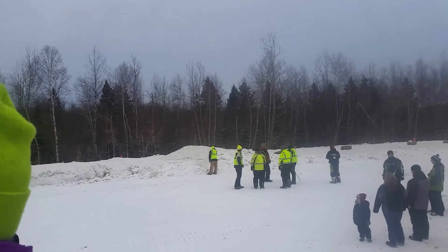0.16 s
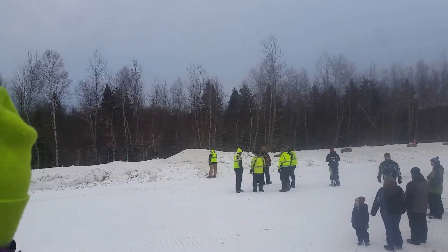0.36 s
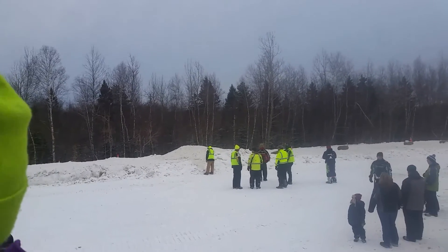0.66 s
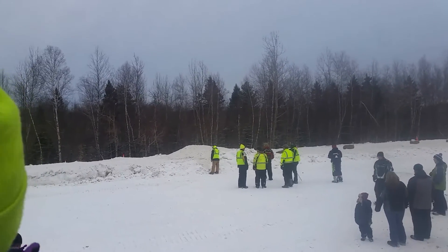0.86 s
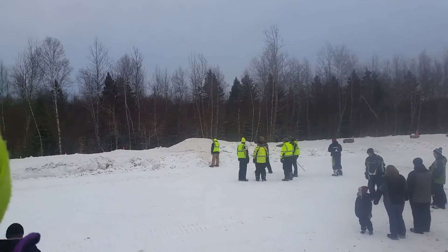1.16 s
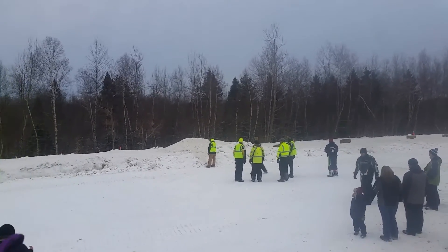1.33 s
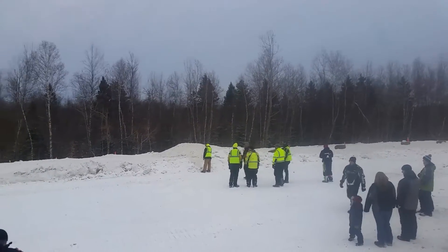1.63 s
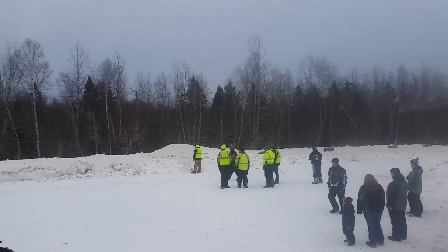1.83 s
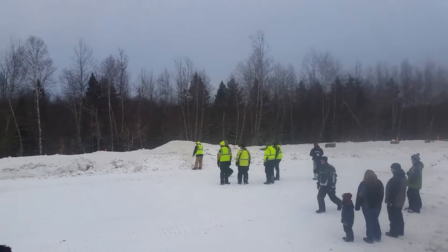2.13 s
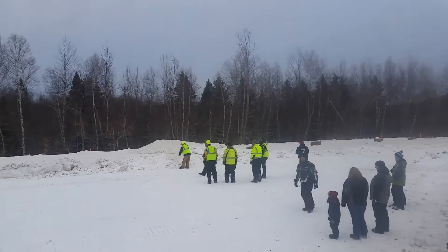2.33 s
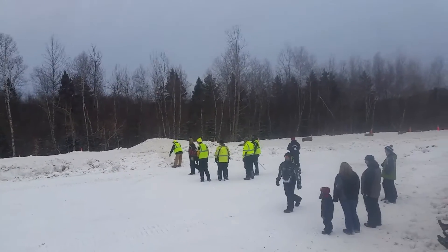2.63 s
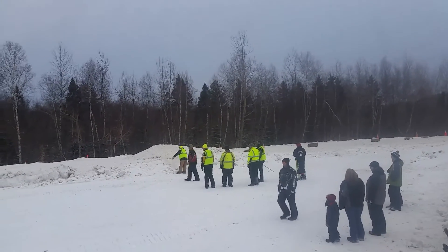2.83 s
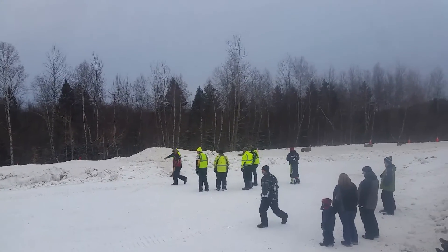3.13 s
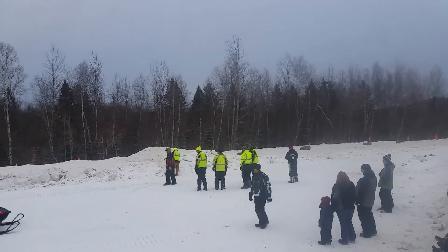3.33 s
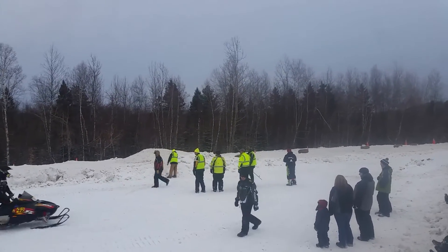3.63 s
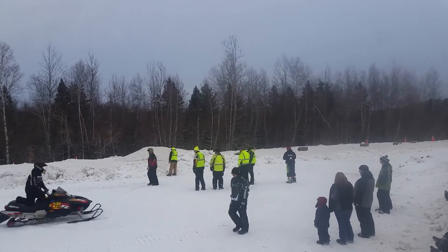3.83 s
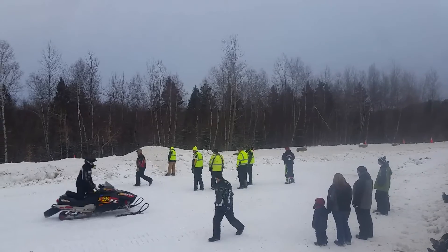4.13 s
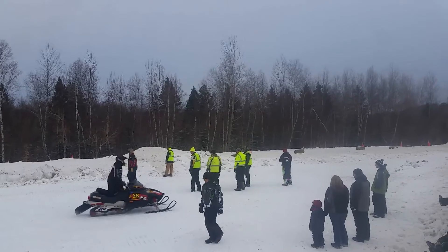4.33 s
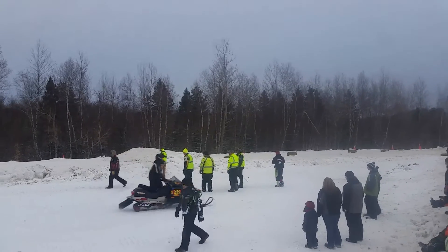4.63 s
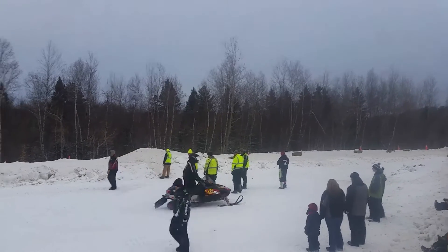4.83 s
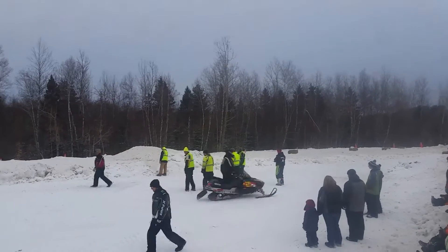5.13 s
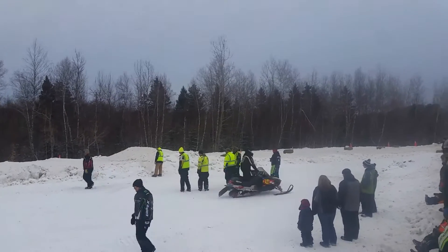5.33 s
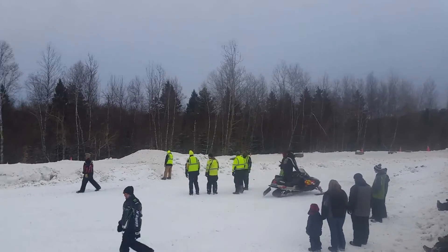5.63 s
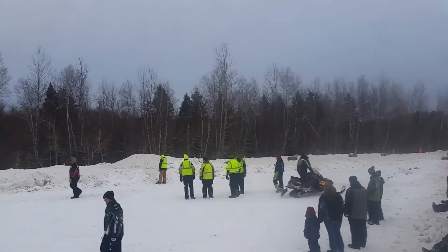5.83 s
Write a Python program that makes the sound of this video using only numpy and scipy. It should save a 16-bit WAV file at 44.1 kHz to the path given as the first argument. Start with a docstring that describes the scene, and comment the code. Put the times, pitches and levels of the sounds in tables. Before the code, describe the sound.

A two-stroke twin snowmobile is already running at the start and continues for the full six seconds, creeping past on part throttle. Roughly 115 to 130 exhaust strokes a second merge into a deep, hollow, buzzing throb. Over it, uneven sharp cracks come many times a second, singly or in short runs, with metallic panel ringing and tight slaps off chassis and snow. The revs jump slightly at about 1 s, sag around 2.2 to 2.5 s, rise near 3.2 s, dip near 3.7 s, rise again at 4.6 s and ease after 5.5 s. The low throb is strong around 0.3 and 2.2 s and weaker after 4 s, while pops grow harder, loudest around 5.0 to 5.7 s. Airy track and fan hiss flickers throughout, growing somewhat later. Low wind rumbles on a close, slightly saturated phone microphone outdoors. The stereo moves subtly from left toward centre and right.

```python
"""Snowmobile creeping past

A two-stroke twin snowmobile creeps across a snowy field on part throttle, passing a phone from left to right.
Every stroke thumps the exhaust pipe, made by ringing resonances with soft pulses; a silencer boom adds to it.
Only some charges burn hard: these crack out of the outlet as sharp clicks, slap back off chassis and snow,
and make panels ring. Filtered noise makes track and fan hiss, and wind rumble on the two microphone ports."""
import sys
import numpy as np
from scipy import signal
from scipy.fft import rfft, irfft
from scipy.io import wavfile
from scipy.ndimage import uniform_filter1d, map_coordinates

SR = 44100
rng = np.random.default_rng(int(sys.argv[2]) if len(sys.argv) > 2 else 0)


def materialize(psi):
    """Save the field psi as 16-bit PCM at rate SR to the path in sys.argv[1].

    A 1-D psi becomes a single channel; in a 2-D psi each row is a channel.
    """
    bounded = np.clip(np.atleast_2d(psi).T, -1, 1)
    quanta = np.round(bounded * 32767).astype(np.int16)
    wavfile.write(sys.argv[1], SR, quanta)


N = 263806
T = np.arange(N) / SR  # time of every sample, s

# The drive; each layer adds its own fixed trim to these levels:
# (t/s, pipe level/dB, upper pipe ring against it/dB, hiss level/dB, treble level/dB, wind level/dB)
DRIVE = [(0.0, -12.5, -65, -44.5, -39, -15), (0.271, -7, -18, -38, -38.5, -17.5),
         (0.45, -14, -14, -46.5, -35, -17.5), (0.93, -8.5, -15, -35.5, -40.5, -14.5),
         (1.04, -10, -14.5, -39.5, -33.5, -14.5), (1.179, -10.5, -14, -41, -36.5, -19),
         (1.291, -10.5, -13.5, -39, -34.5, -17.5), (1.45, -13, -15.5, -45.5, -36.5, -16.5),
         (1.831, -12, -15, -33.5, -35, -16.5), (2.201, -7.5, -18, -34.5, -41.5, -17),
         (2.456, -9, -14, -37.5, -44, -14.5), (2.733, -11.5, -13, -40.5, -37, -14),
         (2.93, -14.5, -15.5, -32, -40, -16.5), (3.202, -11, -24, -33.5, -33.5, -15.5),
         (3.55, -12, -20, -32, -35, -18.5), (4.081, -13.5, -10, -35.5, -38.5, -19.5),
         (4.604, -17, -9.5, -34.5, -40, -17), (4.996, -13, -14, -30, -38, -14),
         (5.548, -17, -8.5, -33, -39, -14.5), (5.98, -14, -7.5, -36, -38, -15.5)]
# How fast the strokes follow each other: (t/s, stroke rate f/Hz)
STROKE_RATE = [(0, 114), (.15, 116.5), (.3, 113.5), (.5, 118.5), (.7, 116), (.9, 119), (1.03, 130),
               (1.17, 125.5), (1.28, 132), (1.45, 126), (1.65, 128), (1.9, 120), (2.2, 117.5), (2.45, 117),
               (2.8, 124), (3.15, 130), (3.45, 124.5), (3.7, 121), (4.1, 125.5), (4.55, 130), (5, 126),
               (5.55, 121), (5.75, 124), (5.98, 124)]
# The machine crosses in front of the phone:
# (t/s, left port lead/ms, left minus right/dB, treble left minus right/dB)
CROSSING = [(0, 0.38, 5.5, -2), (0.504, 0.43, 9, -0.5), (1, 0.36, 4.5, 6.5), (1.4, 0.47, 4.5, 8),
            (1.796, 0.39, -2.5, 8.5), (2.299, 0.4, 4.5, 5), (2.601, 0.42, -0.5, 1.5),
            (3.199, 0.25, -1.5, 1), (3.602, 0.17, -1.5, 6.5), (3.999, 0.12, 1, 3), (4.599, 0.13, 6, 1.5),
            (5.199, -0.13, -1.5, 2.5), (5.98, -0.15, 2, 3)]

# Wind rumble: (f/Hz, level per Hz/dB)
WIND_COLOUR = [(20, -26), (45, -9.5), (65, -1.5), (90, -3.5), (140, 5.5), (190, -3.5), (300, -3.5),
               (500, -14), (2500, -100)]
# The ports ring in the top octave: (f/Hz, level per Hz/dB)
TREBLE_COLOUR = [(4410, -83.5), (7500, -46.5), (8970, -35), (10700, -23), (11100, -19), (12700, -18),
                 (14600, -16.5), (15600, -21.5), (16300, -101.5)]
# How differently the two ports hear each pitch: (f/Hz, left minus right/dB)
PORT_COLOUR = [(500, 11), (700, 2.5), (950, 3.5), (1290, 1), (1800, 6), (2380, 15), (3200, 18.5),
               (4400, 15.5), (8120, 12.5), (11000, -3.5), (13000, 9), (15000, 10.5)]
# Colour of cracks and hiss from the machine's nose, flank and tail: (f/Hz, level per Hz/dB)
NOSE_COLOUR = [(350, -44.5), (600, -12.5), (633, -17), (696, -5.5), (757, 1), (955, -10), (1370, -13),
               (2160, -6), (3770, -17.5), (4150, -22), (4860, -25), (7500, -36.5), (9750, -83),
               (16500, -120)]
FLANK_COLOUR = [(350, -36.5), (600, -48), (711, -7), (773, -5), (1160, -13.5), (1300, -17), (1500, -20.5),
                (1640, -13.5), (1920, -17), (3850, -29), (4970, -39.5), (7500, -48.5), (9750, -96.5),
                (16500, -120)]
TAIL_COLOUR = [(350, -39.5), (600, 1), (824, -3.5), (897, -15.5), (1010, -6.5), (1260, -5.5), (1760, -8),
               (1980, -8), (2600, -9), (2880, -20), (3250, -17), (3700, -23.5), (4100, -24), (5400, -32),
               (7500, -42), (9750, -75), (16500, -120)]
VIEWS_S = 0.54, 2.63, 4.9  # when nose, flank and tail are heard, s

# Exhaust pipe resonances, low and upper: (f/Hz, width/Hz, level/dB)
LOW_PIPE = [(62, 10, -21.5), (129, 70, 5), (249.7, 38.9, 19)]
UPPER_PIPE = [(376.5, 169, 6.87), (437.5, 172.3, 4.37)]
# Silencer resonances after a hard burn: (f/Hz, width/Hz, level/dB)
BOOM_MODES = [(70.6, 22, -1), (146, 49, -3), (273, 13.3, 5.5), (435.6, 42, 0.5)]
# Ringing cowl and silencer panels: (f/Hz, width/Hz, level/dB, faces the phone at t/s, swell time/s)
PANEL_MODES = [(4750, 130, -6.5, 0.45, 0.72), (3660, 200, -11, 1.3, 0.58), (5800, 1200, -7.5, 3.9, 0.66),
               (1685, 61, -10, 1.8, 0.47), (2120, 300, -12, 0.23, 0.48), (646, 190, -0.5, 0.8, 1),
               (964, 73, 1, 0.82, 1), (1620, 100, -15, 0.6, 0.98), (690, 45, 2.5, 2.45, 0.33),
               (1279, 48, -10.5, 2.6, 0.68), (991, 12, -13, 3.7, 0.77), (526, 50, -11, 4.8, 0.88),
               (1145, 13, -4.5, 3.7, 0.065), (1160, 37, -5, 9.3, 0.14), (1373, 54, -7.5, 4.1, 0.46),
               (1290, 64, -3.5, 4.7, 0.36), (3000, 120, -10.5, 4.3, 0.26), (909, 36, -4.5, 4.8, 0.53),
               (1050, 38, -13, 5.5, 0.13), (1210, 35, -10.5, 5.8, 0.32), (1490, 35, -12.5, 10, 0.7),
               (1930, 170, -9, 5.8, 1), (3080, 490, -17, 4.3, 0.42), (2400, 240, -14.5, 5.3, 0.11),
               (2040, 170, -6, 6.4, 0.35), (648, 14, -3.5, 3.8, 0.96), (690, 40, -5.5, 5.15, 0.2),
               (2800, 250, -15, 2.4, 0.18), (1300, 58, -5, 1.25, 0.15), (1880, 130, -8, 2.2, 0.2),
               (3070, 180, -8.5, 6, 0.26), (3480, 210, -7, 3.8, 0.43), (2360, 470, -5, 3.5, 0.32)]

# The hardest burns: (t/s, crack level/dB, hard strokes ahead, hard strokes behind)
HARD_BURNS = [(0.0579, -18, 0, 0), (0.0839, -18, 0, 0), (0.1357, -16, 1, 0), (0.2134, -16, 0, 0),
              (0.2843, -25, 0, 1), (0.3454, -17, 1, 1), (0.3879, -20, 1, 0), (0.4133, -18, 0, 0),
              (0.4386, -19, 0, 0), (0.4724, -19, 0, 1), (0.5144, -17, 0, 0), (0.5398, -21, 0, 1),
              (0.5824, -19, 1, 0), (0.6255, -17, 1, 0), (0.6602, -18, 0, 1), (0.7031, -17, 0, 0),
              (0.7377, -23, 1, 1), (0.7804, -18, 1, 0), (0.8061, -20, 0, 0), (0.8317, -17, 0, 0),
              (0.866, -17, 0, 1), (0.8998, -19, 0, 0), (0.925, -18, 0, 0), (0.9419, -25, 1, 0),
              (0.975, -17, 1, 8), (1.0605, -21, 0, 3), (1.1069, -22, 0, 2), (1.1385, -23, 1, 3),
              (1.1939, -18, 1, 12), (1.3093, -19, 0, 3), (1.3636, -22, 0, 1), (1.3946, -18, 0, 0),
              (1.4344, -16, 1, 2), (1.4898, -18, 0, 3), (1.5449, -18, 1, 2), (1.5919, -18, 1, 2),
              (1.6389, -17, 1, 0), (1.6623, -19, 0, 0), (1.7179, -17, 1, 2), (1.7733, -19, 0, 1),
              (1.8057, -20, 0, 0), (1.8301, -19, 0, 0), (1.8878, -17, 0, 1), (1.9295, -18, 0, 0),
              (1.963, -17, 0, 0), (1.9967, -18, 1, 0), (2.0307, -18, 0, 1), (2.0725, -17, 0, 0),
              (2.1149, -16, 1, 1), (2.1576, -17, 0, 2), (2.2, -20, 0, 2), (2.26, -21, 1, 1),
              (2.3113, -25, 2, 1), (2.3713, -25, 1, 0), (2.4571, -22, 0, 0), (2.4828, -27, 1, 0),
              (2.5425, -18, 0, 1), (2.5844, -19, 1, 0), (2.6178, -26, 1, 0), (2.6345, -26, 0, 0),
              (2.6425, -18, 0, 0), (2.6839, -18, 0, 5), (2.7494, -23, 0, 1), (2.7822, -19, 1, 1),
              (2.8229, -23, 1, 2), (2.8715, -20, 1, 4), (2.9351, -18, 1, 0), (2.9589, -17, 0, 0),
              (2.9907, -18, 1, 0), (3.0222, -20, 0, 2), (3.0456, -24, 0, 0), (3.069, -20, 0, 3),
              (3.1156, -23, 1, 0), (3.1388, -22, 1, 0), (3.1621, -24, 1, 2), (3.2006, -22, 0, 1),
              (3.2316, -22, 1, 0), (3.2551, -22, 0, 1), (3.2784, -21, 1, 0), (3.294, -26, 1, 0),
              (3.3175, -17, 0, 0), (3.3412, -20, 0, 1), (3.3647, -21, 0, 2), (3.4042, -19, 0, 0),
              (3.4367, -18, 0, 2), (3.4931, -17, 0, 1), (3.5581, -22, 2, 2), (3.5826, -18, 0, 1),
              (3.6072, -23, 0, 0), (3.6153, -16, 0, 0), (3.6482, -17, 0, 1), (3.6897, -14, 0, 1),
              (3.7227, -19, 0, 1), (3.7474, -22, 0, 0), (3.772, -16, 0, 1), (3.8049, -18, 1, 2),
              (3.8457, -17, 0, 0), (3.8702, -19, 1, 2), (3.9027, -22, 0, 0), (3.9107, -14, 0, 0),
              (3.935, -19, 0, 0), (3.9511, -22, 0, 1), (3.9754, -15, 1, 2), (4.0236, -17, 0, 3),
              (4.0797, -17, 1, 2), (4.1197, -14, 0, 1), (4.16, -14, 1, 2), (4.2078, -16, 1, 2),
              (4.2555, -15, 1, 0), (4.2793, -17, 1, 1), (4.3268, -16, 1, 2), (4.3659, -17, 0, 2),
              (4.4204, -17, 1, 0), (4.4435, -20, 1, 0), (4.4665, -19, 1, 0), (4.4973, -17, 1, 0),
              (4.5205, -16, 1, 0), (4.5435, -18, 1, 0), (4.5818, -17, 0, 0), (4.6047, -19, 1, 1),
              (4.6202, -18, 0, 0), (4.628, -22, 0, 1), (4.6589, -16, 1, 0), (4.682, -18, 1, 0),
              (4.7208, -19, 0, 3), (4.7828, -16, 0, 2), (4.8061, -21, 0, 0), (4.845, -18, 0, 1),
              (4.8766, -19, 0, 0), (4.9159, -20, 0, 0), (4.9395, -19, 1, 0), (4.9871, -15, 1, 2),
              (5.0422, -14, 0, 0), (5.066, -16, 0, 0), (5.1055, -15, 0, 0), (5.1294, -15, 0, 0),
              (5.1453, -20, 0, 0), (5.1691, -15, 0, 0), (5.2092, -16, 0, 0), (5.2332, -16, 0, 0),
              (5.2654, -14, 1, 0), (5.3222, -15, 0, 1), (5.3633, -14, 1, 0), (5.3959, -16, 0, 0),
              (5.4286, -15, 1, 0), (5.478, -13, 1, 2), (5.5443, -12, 1, 2), (5.5943, -20, 0, 1),
              (5.6276, -14, 1, 0), (5.6682, -14, 1, 0), (5.6925, -16, 1, 0), (5.7168, -17, 0, 2),
              (5.7732, -19, 1, 0), (5.7975, -20, 1, 0), (5.8135, -22, 0, 0), (5.8376, -16, 0, 0),
              (5.8617, -19, 0, 0), (5.9019, -20, 0, 1), (5.9502, -18, 0, 1), (5.9746, -22, 0, 0)]
# Crack of the strokes that hardly burn: (t/s, level/dB)
SOFT_BURNS = [(0, -29.5), (0.6, -38), (1.2, -35.5), (1.8, -39.5), (2.2, -32.5), (2.45, -37), (2.7, -33),
              (3.2, -44), (3.8, -37), (4.4, -42), (5, -34), (5.5, -36), (5.98, -29)]
# Pressure jump at the outlet: (t/s, level against the crack/dB)
BLAST_LEVEL = [(0, 9), (1.0, 8.5), (2.4, 9), (3.5, 9), (4.7, 3.5), (5.3, 11), (5.98, 4)]
# Slaps off the chassis: (delay at nose/ms, delay at flank/ms, delay at tail/ms, level/dB)
CHASSIS_SLAPS = [(1.1, 1.2, 1.1, -13), (3.3, 3.1, 3.0, -13), (4.6, 4.7, 4.4, -15), (5.8, 6.1, 5.7, -18)]
# The strongest slap, off the snow: (t/s, delay/ms, level/dB)
SNOW_SLAP = [(0, 2.35, -7), (1.2, 2.5, -5), (2.4, 2.5, -7), (3.2, 2.2, -8), (3.7, 1.8, -5), (4.7, 1.8, -5),
             (5.05, 1.93, -3), (5.25, 1.93, -3), (5.33, 2.45, -3), (5.98, 2.45, -5)]

TWIN_SHARE = 0.18  # one cylinder pushes harder than the other
PUSH_SCATTER_DB, SOFT_SCATTER_DB, RUN_SCATTER_DB, TREBLE_SCATTER_DB = 0.9, 1.5, 1.2, 2.5
BEFORE_DB = -3  # hard strokes ahead of the hardest
RUN_DB, RUN_STROKES = -8, 0.69  # those behind settle this far down, this quickly
PIPE_LEAD_MS = 2.85  # the pipe starts to swing, sucking first, before the crack leaves the outlet
BOOM_LEAD_MS, BOOM_DB = 1.5, -17.5  # level is against the smoothed pipe level
BLAST_MS, SUCK_MS = 0.41, 1.0  # fading times of the pressure jump and the longer suction


def undb(db):
    """Turn decibels into a plain multiplier."""
    return 10 ** (np.asarray(db) / 20)


def level(x, db):
    """Scale to an rms level."""
    return x * undb(db) / np.sqrt(np.mean(x ** 2))


def follow(table, t=T):
    """Read each column of a table whose first column is time, in straight lines between its rows."""
    s, *columns = np.transpose(table)
    return [np.interp(t, s, column) for column in columns]


def butter(x, order, hz, kind="low"):
    """A smooth filter that keeps the pitches on one side of hz, or between two."""
    return signal.sosfilt(signal.butter(order, hz, kind, fs=SR, output="sos"), x)


def colour(x, table, share=1):
    """Filter whose gain follows (f/Hz, dB) points, never sounding before its input; unit energy."""
    hz, db = np.transpose(table)
    size = 2048
    bins_hz = np.arange(size // 2 + 1) * SR / size
    log_gain = share * np.interp(np.log(bins_hz + 1), np.log(hz), db) * np.log(10) / 20
    # folding the cepstrum forward in time packs the response at its start
    cepstrum = irfft(log_gain)
    cepstrum[1:size // 2] *= 2
    cepstrum[size // 2 + 1:] = 0
    response = irfft(np.exp(rfft(cepstrum)))
    return signal.oaconvolve(x, response / np.sqrt(np.sum(response ** 2)))[:N]


def clicks(s, size):
    """Impulses at exact times, each spread over its neighbouring samples by a windowed sinc."""
    at = s * SR
    tap = np.floor(at)[:, None] + np.arange(-7, 9)
    off = tap - at[:, None]
    weight = size[:, None] * np.sinc(off) * np.cos(np.pi * off / 16) ** 2
    return np.bincount(np.clip(tap, 0, N).astype(int).ravel(), weight.ravel(), N + 1)[:N]


def fade(x, ms):
    """Each impulse dies away with this time constant."""
    return signal.lfilter([1], [1, -np.exp(-1000 / (ms * SR))], x)


def walk(rate):
    """Random levels held 1 / rate s and smoothed twice."""
    k = int(SR / rate)
    held = np.repeat(rng.standard_normal(N // k + 1), k)[:N]
    return uniform_filter1d(uniform_filter1d(held, k), k)


def ring(pulses, modes):
    """Sum of resonances at an even rms level; neighbours swing in opposite sense."""
    total = 0
    for k, (hz, width, db) in enumerate(modes):
        b, a = signal.iirpeak(hz, hz / width, SR)
        total = total + (-1) ** k * undb(db) * signal.lfilter(b, a, pulses)
    return level(total, 0)


def wind(wind_db):
    """Rumbling air: a gust shared by both ports, and weaker eddies at each of them."""
    gust = level(colour(rng.standard_normal(N), WIND_COLOUR), 0)
    ports = []
    for _ in range(2):
        eddies = level(colour(rng.standard_normal(N), WIND_COLOUR), -13)
        ports.append((gust + eddies) * undb(wind_db - 2.5 + 0.39 * walk(5.6)))
    return ports


def hiss(db, flicker_db):
    """Track, belt and fan noise: many tiny random knocks, with a flickering level."""
    return rng.standard_normal(N) * undb(db + flicker_db * walk(37))


def bright(x):
    """Turbulence carries little below the mids."""
    return butter(x, 2, 1500, "high")


def facing(x):
    """The colour turns from nose to flank to tail as the machine goes by."""
    total = 0
    for share, table in zip(np.eye(3), (NOSE_COLOUR, FLANK_COLOUR, TAIL_COLOUR)):
        total = total + np.interp(T, VIEWS_S, share) * colour(x, table)
    return total


def strokes(rate_hz):
    """Times of all strokes, filling in between the hardest burns at the stroke rate; and which are the hardest."""
    turns = np.cumsum(rate_hz) / SR
    at_burn = np.interp(np.array(HARD_BURNS)[:, 0], T, turns)
    # a whole number of strokes, at least one, from each hardest burn to the next
    index = np.cumsum(np.maximum(1, np.round(np.diff(at_burn, prepend=0)))).astype(int)
    left = int(turns[-1] - at_burn[-1])
    known_index = np.r_[0, index, index[-1] + left]
    known_turns = np.r_[at_burn[0] - index[0], at_burn, at_burn[-1] + left]
    stroke_turns = np.interp(np.arange(index[-1] + left + 1), known_index, known_turns)
    return np.interp(stroke_turns, turns, T), index


def burns(s, hardest, chance):
    """Crack level of every stroke: faint, but for the runs of hard burns around each hardest one."""
    db = follow(SOFT_BURNS, s)[0] + SOFT_SCATTER_DB * chance
    for k, (_, top_db, before, after) in zip(hardest, HARD_BURNS):
        step = np.arange(-int(before), int(after) + 1)
        drop_db = np.where(step < 0, BEFORE_DB, RUN_DB * (1 - np.exp(-step / RUN_STROKES)))
        db[k + step] = top_db + drop_db + RUN_SCATTER_DB * chance[k + step] * (step != 0)
    return db


def pipe(s, push, upper_db):
    """Soft pressure pulses, about a millisecond long, ring the pipe."""
    pulses = butter(clicks(s, push), 4, 700)
    return ring(pulses, LOW_PIPE) - undb(upper_db + 5.5) * ring(pulses, UPPER_PIPE)


def boom(s, burn_db, pipe_db):
    """Hard burns set the air in the silencer swinging at a few low pitches."""
    swing = ring(clicks(s - BOOM_LEAD_MS / 1000, undb(1.3 * burn_db)), BOOM_MODES)
    return undb(uniform_filter1d(pipe_db, size=SR // 2) + BOOM_DB) * butter(swing, 2, (50, 800), "band")


def panels(blows):
    """Each panel rings after a crack; its sound is beamed, so it swells and fades as the machine goes by."""
    out = 0
    blows = butter(blows, 3, 3800)  # the mounts soften the blow
    for hz, width, db, s, span in PANEL_MODES:
        b, a = signal.iirpeak(hz, hz / width, SR)
        ringing = signal.lfilter(undb(db) * b / np.sqrt(b[0]), a, blows)
        out = out + np.exp(-((T - s) / span) ** 2) * ringing
    return out


def blast(s, db):
    """A rounded jump in pressure, the suction that balances it, and its slap off the snow."""
    size = undb(db + follow(BLAST_LEVEL, s)[0])
    slap_ms, slap_db = follow(SNOW_SLAP, s)
    front = clicks(s, size) + clicks(s + slap_ms / 1000, size * undb(slap_db - 4))
    # equal areas of push and suction
    jump = fade(front, BLAST_MS) - BLAST_MS / SUCK_MS * fade(front, SUCK_MS)
    return butter(jump, 3, 3200)


def puff(s, size, ms, db):
    """Turbulent gas follows each crack as a fading burst of noise."""
    return undb(db) * fade(clicks(s, size), ms) * rng.standard_normal(N)


def crack(s, size, puff_ms, puff_db, slap_db):
    """A shock front, its slaps off chassis and snow, and a fading puff of turbulent gas."""
    slaps = [(np.interp(s, VIEWS_S, ms), db) for *ms, db in CHASSIS_SLAPS]
    slaps.append(follow(SNOW_SLAP, s))
    out = clicks(s, size) + puff(s, size, puff_ms, puff_db)
    for ms, db in slaps:
        out = out + clicks(s + ms / 1000, size * undb(db + slap_db))
    return out


def scene():
    """The machine as each port hears it, plus wind."""
    pipe_db, upper_db, hiss_db, top_db, wind_db = follow(DRIVE)
    winds = wind(wind_db)
    at, hardest = strokes(follow(STROKE_RATE)[0])
    chance = rng.standard_normal((3, len(at)))
    crack_db = burns(at, hardest, chance[0])

    # how hard each charge burns against its neighbours sets the push on the pipe
    burn_db = crack_db - uniform_filter1d(crack_db, size=31)
    push = 0.14 + undb(0.32 * burn_db + PUSH_SCATTER_DB * chance[1])
    # a hard burn leaves the next charges lean, so the mean push stays even
    push = push / uniform_filter1d(push, size=9) + TWIN_SHARE * (-1) ** np.arange(len(at))
    # the flywheel evens out the strokes
    even = at[0] + np.r_[0, np.cumsum(uniform_filter1d(np.diff(at), size=3))]

    engine = -undb(pipe_db) * pipe(even - PIPE_LEAD_MS / 1000, push, upper_db)
    engine = engine - boom(even, burn_db, pipe_db) + blast(even, crack_db)
    size = undb(crack_db + 14.5)
    mids = facing(crack(even, size, 7, -27, 0) + hiss(hiss_db - 16.5, 5.7))
    mids = mids + undb(5) * panels(clicks(even, size))
    # harder cracks carry more treble
    treble_db = np.interp(at, T, top_db) + 0.86 * (crack_db + 27.5) + 19
    treble = undb(treble_db + TREBLE_SCATTER_DB * chance[2])
    shared = crack(even, treble, 3, -16, -7)

    lead_ms, pan_db, top_pan_db = follow(CROSSING)
    out = []
    for side, port_wind in zip((1, -1), winds):  # left, right
        lead_s = side * lead_ms / 2000  # half the lead to each port

        def shift(x, share):
            """Sound reaches the nearer port earlier."""
            return map_coordinates(x, [(T + share * lead_s) * SR], mode="nearest")

        # each port meets eddies of its own
        sharp = shared + puff(even, treble, 5.9, -20)
        gas = puff(even, size, 5.46, -17)
        near = shift(mids, 1) * undb(side * pan_db / 2)
        near = near + facing(bright(gas + hiss(hiss_db + 1.5, 1.3)))
        highs = shift(sharp, 1) * undb(side * top_pan_db / 2) + hiss(top_db - 7.5, 1.3)
        highs = colour(highs, TREBLE_COLOUR)
        upper = level(colour(near + highs, PORT_COLOUR, share=side / 2), -31.5 - 3.67 * side)
        out.append(shift(engine, 0.6) + upper + port_wind)
    return np.array(out)


def record(dry):
    """The phone cuts the deepest bass, rounds the loudest peaks and cuts the top."""
    dry = butter(dry, 2, 35, "high")
    dry = np.tanh(0.9 * dry) / 0.9
    return signal.sosfilt(signal.ellip(10, 0.2, 70, 16450, fs=SR, output="sos"), dry)


dry = scene()
out = record(dry)
materialize(out)
```